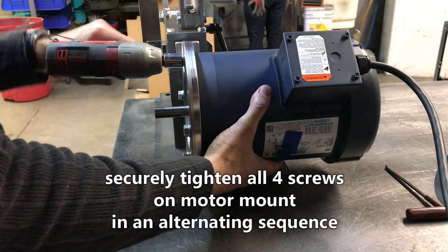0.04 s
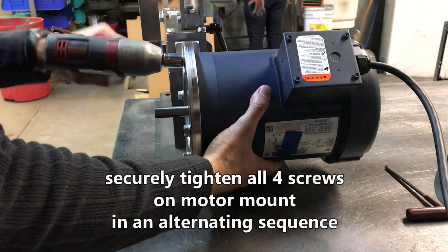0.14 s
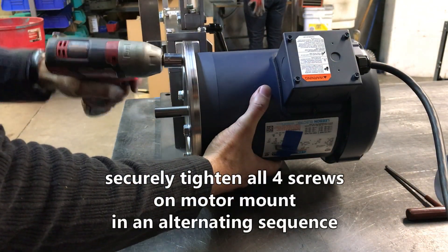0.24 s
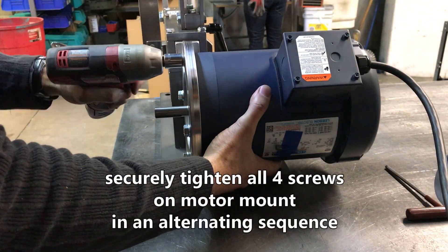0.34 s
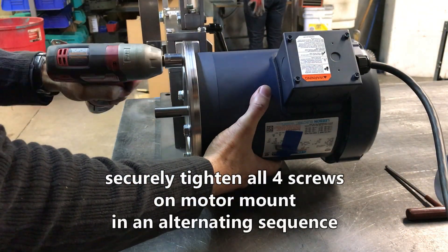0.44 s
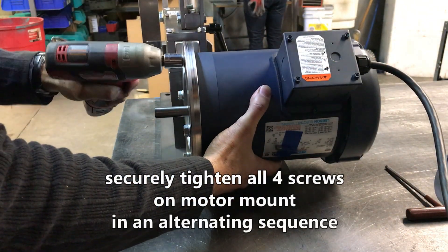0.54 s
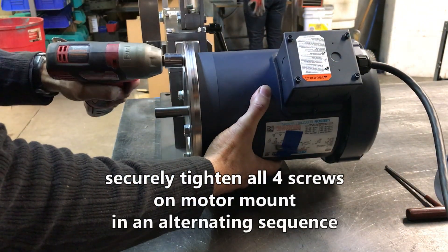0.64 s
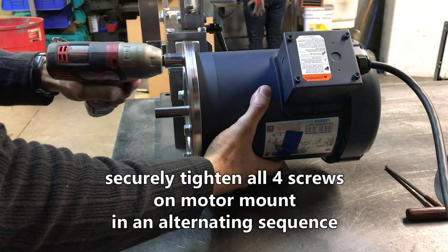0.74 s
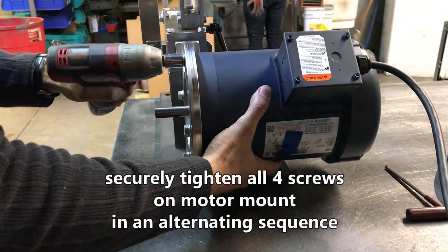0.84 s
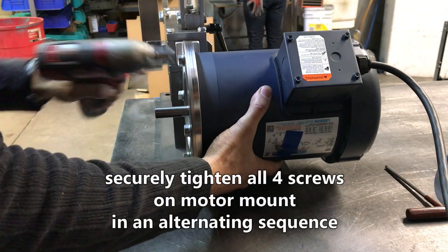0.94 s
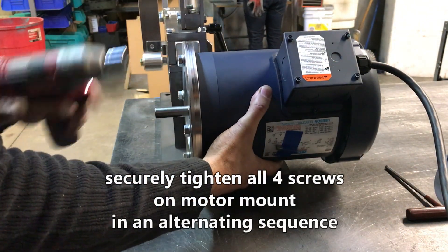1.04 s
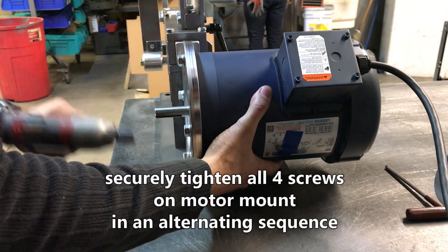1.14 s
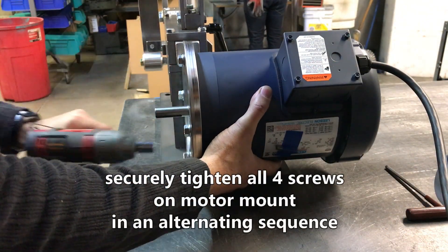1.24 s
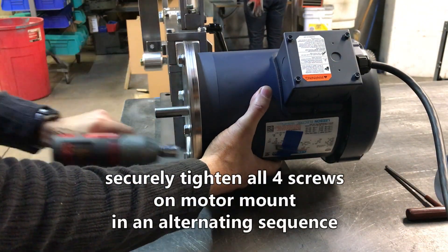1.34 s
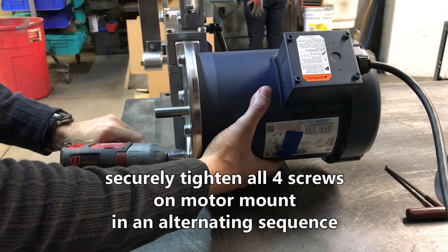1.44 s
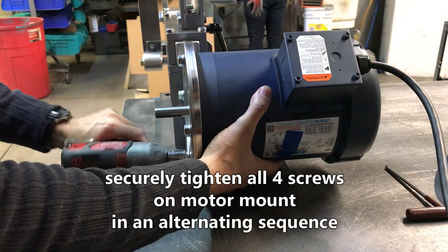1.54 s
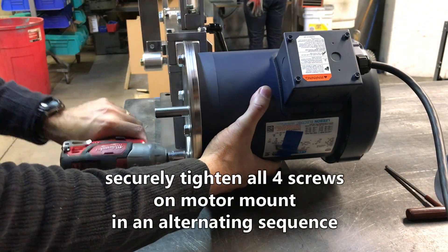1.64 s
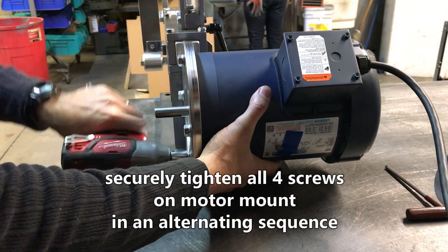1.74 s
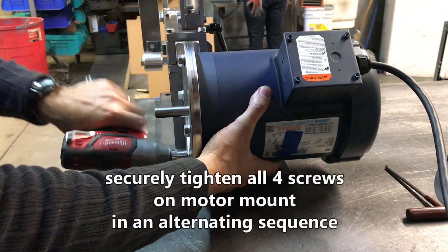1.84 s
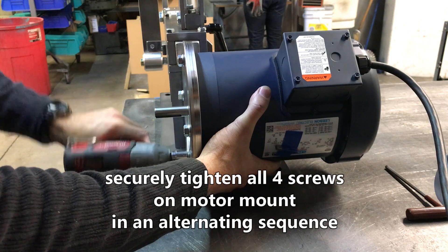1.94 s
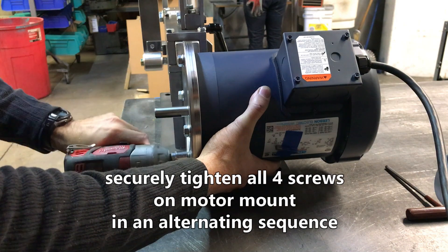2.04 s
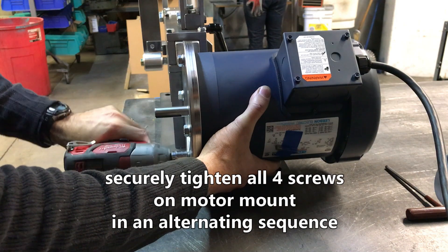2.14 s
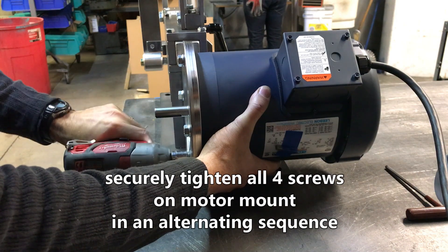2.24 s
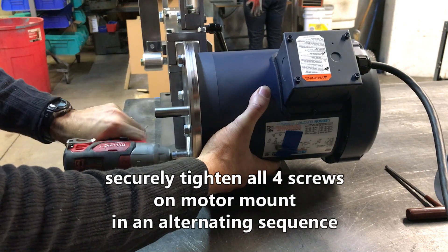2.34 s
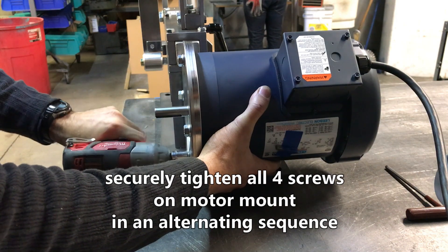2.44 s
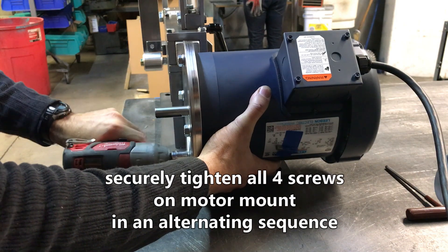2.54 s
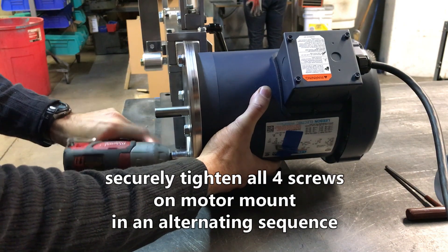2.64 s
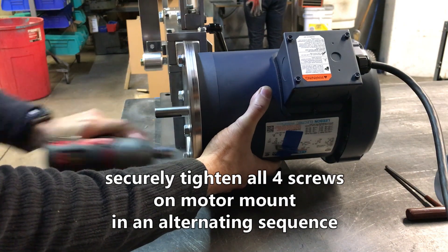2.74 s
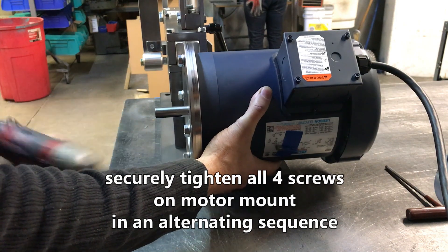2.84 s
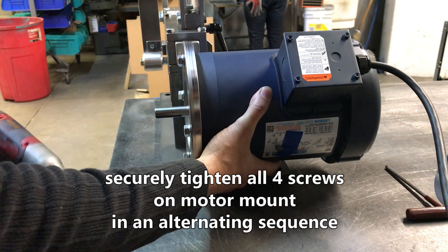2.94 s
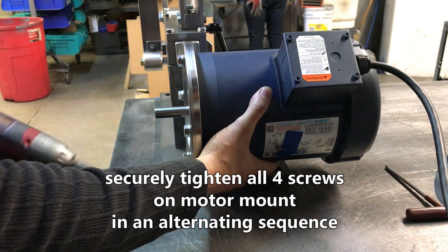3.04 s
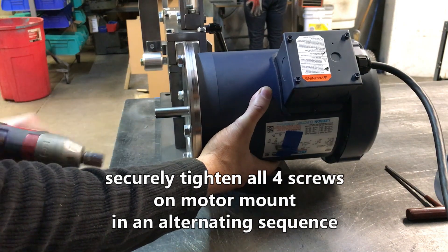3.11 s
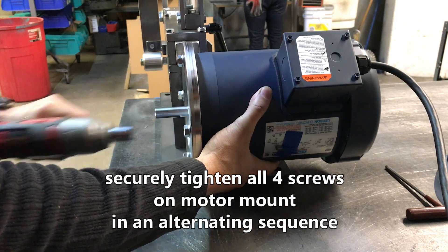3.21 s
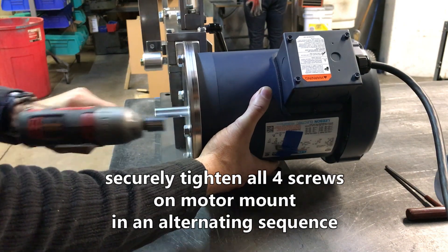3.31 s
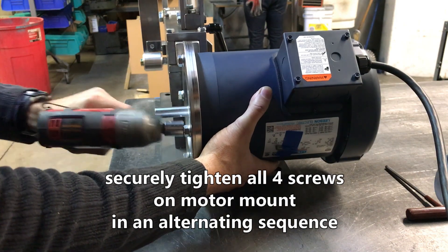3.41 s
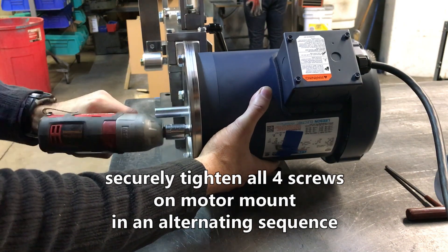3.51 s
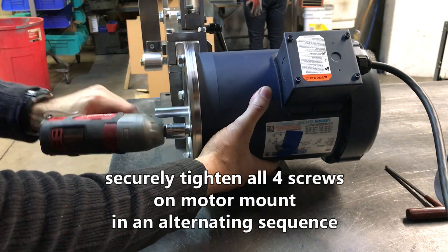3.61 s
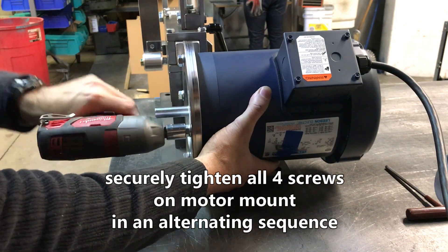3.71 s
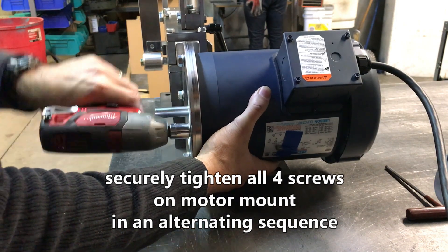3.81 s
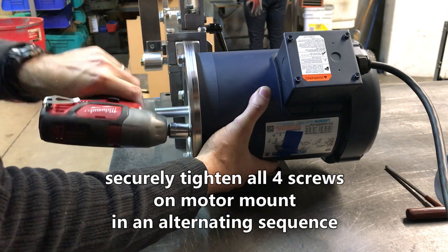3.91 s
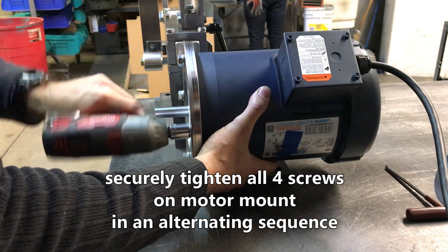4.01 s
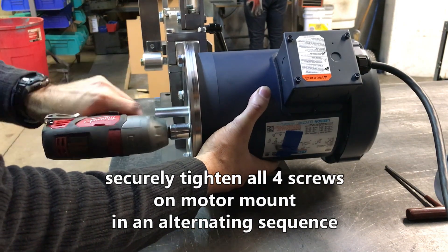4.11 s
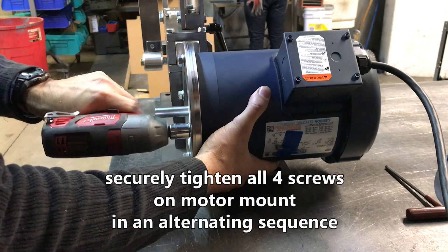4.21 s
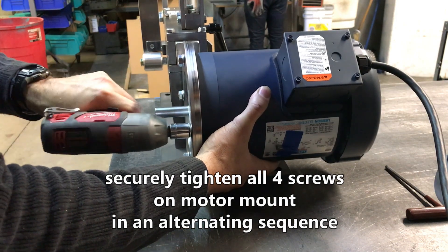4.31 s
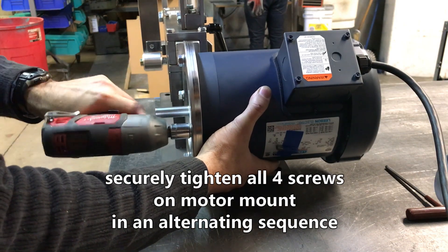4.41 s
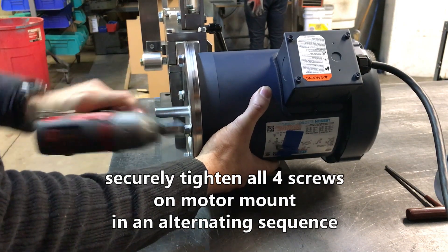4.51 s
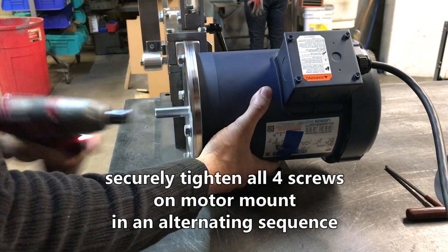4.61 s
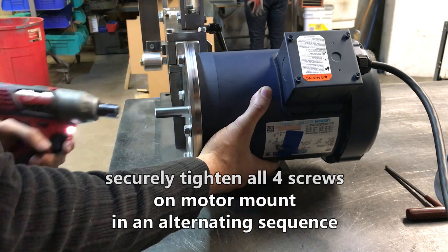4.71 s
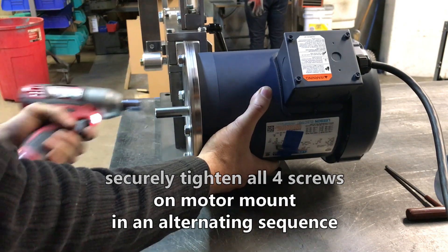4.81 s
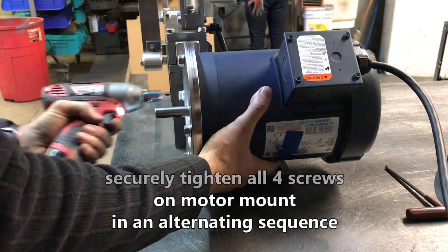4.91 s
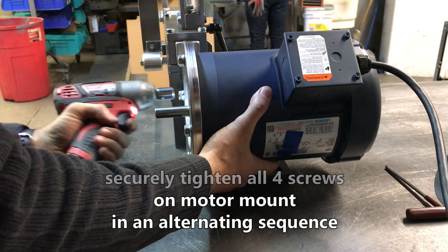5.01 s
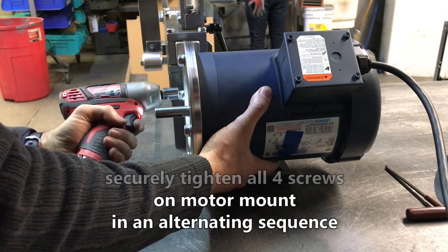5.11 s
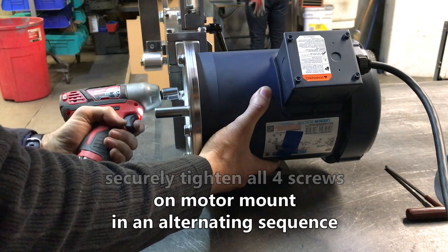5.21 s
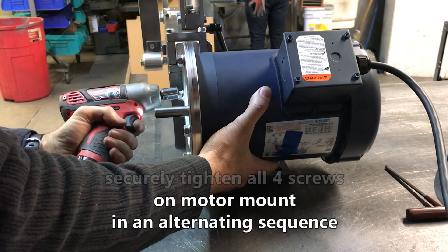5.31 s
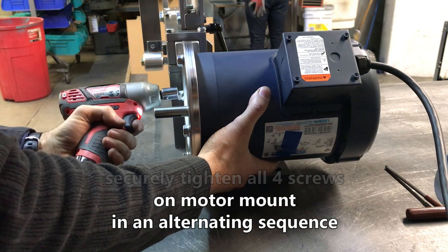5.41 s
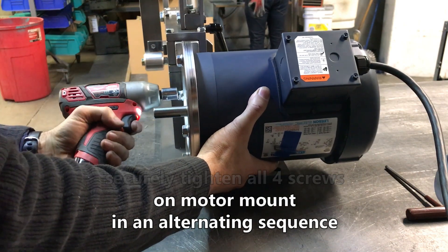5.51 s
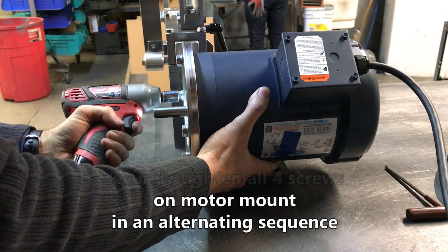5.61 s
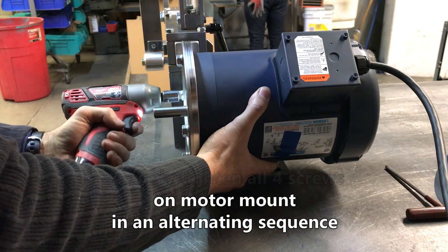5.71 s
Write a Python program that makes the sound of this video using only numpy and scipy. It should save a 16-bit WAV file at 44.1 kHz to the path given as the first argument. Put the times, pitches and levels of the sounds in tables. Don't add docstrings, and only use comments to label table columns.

```python
import sys
import numpy as np
from scipy import signal
from scipy.fft import rfft, irfft, next_fast_len
from scipy.io import wavfile
from scipy.ndimage import map_coordinates

SR = 44100
rng = np.random.default_rng(int(sys.argv[2]) if len(sys.argv) > 2 else 0)


def boost(x):
    u = np.asarray(x, float) / 20
    return 10 ** u


def file_out(sig):
    cols = np.atleast_2d(sig).T
    lim = np.clip(cols, -1, 1)
    pcm = np.round(lim * 32767).astype(np.int16)
    wavfile.write(sys.argv[1], SR, pcm)


N = 253575

# time in seconds, strokes per second.
STROKES = [(0, 11.36), (1.5, 11.4), (2.4, 11.36), (3.2, 11.28), (5.75, 11.24)]
# mode in Hz, width in Hz, dB per stage, lag after stroke in seconds.
CASING = [(368, 26, -4, .014), (452, 14, -1.5, .05), (555, 25, 0.3, .011), (593, 12, -1.3, .012),
          (695, 17, 1.4, .002), (834, 22, -1.3, .03), (975, 30, -2.5, .048), (1030, 20, -2, .025),
          (1120, 18, -2.5, .07), (1238, 18, -2, .08)]
# frequency in Hz, level in dB per Hz.
DRONE = [(200, -57), (330, -11.5), (500, -8.5), (1000, -9), (1300, -10.5), (1650, -14), (3200, -22.5),
         (5000, -44), (8000, -120)]
# frequency in Hz, level in dB per Hz.
HISS = [(900, -32), (1500, -6), (2300, -3), (3200, -2), (4300, -5.5), (4900, -9.5), (6000, -8.5),
        (7000, -12.5), (7600, -15.5), (9500, -15), (10600, -21), (13400, -22), (15800, -30)]
# time in seconds, level in dB.
AIR = [(0, -55.5), (2.5, -55.5), (2.75, -53.5), (3.5, -50.5), (5.75, -51.5)]
# frequency in Hz, level in dB per Hz.
RUMBLE = [(15, -39), (35, -26), (50, -12), (70, -17.5), (120, -7), (200, -10), (320, -12), (450, -65),
          (800, -120)]
# time in seconds, pitch in Hz, level in dB.
WHISTLE = [(2.7, 13450, -95), (2.85, 13420, -82), (3.05, 13380, -79), (3.25, 13300, -78),
           (3.45, 13270, -80), (3.7, 13250, -92)]
# deepest point in seconds, depth in dB (negative lifts the gain).
DUCKS = [(0, -3), (.2, 2), (.9, 4.5), (1.5, 2.8), (2.7, 13), (4.51, 14.5)]
# frequency in Hz, T60 in seconds.
WALLS = [(1000, 0.33), (4000, 0.36), (7000, 0.28), (12000, 0.19)]
# start in seconds, level in dB, sign of the swing, dullness exponent.
JOLTS = [(2.4782, -28, -0.96, 0.17), (4.3556, -20, 0.92, 0.16), (4.3761, -18.5, -1, 0.15),
         (4.4146, -20, 0.74, 0.11), (4.4393, -47, 0.93, .1)]
# time in seconds, level in dB.
GEARS = [
    [(0.57, -51), (0.618, -33), (0.73, -65), (0.768, -57), (0.86, -60), (0.98, -66)],
    [(2.435, -40), (2.565, -38), (2.68, -58)],
    [(4.285, -49), (4.345, -46), (4.47, -64)],
]
# start in seconds, peak in dB, low mode in Hz, middle mode in Hz,
# high share in dB.
CLICKS = [(0.0064, -31, 3570, 5470, -14), (1.427, -14, 4270, 6140, -17.5), (1.454, -30.5, 3990, 6100, -23),
          (1.7945, -17.5, 3730, 6440, -21), (1.9974, -40, 3380, 5350, -13), (3.466, -21, 3920, 5350, -13),
          (3.479, -37, 4030, 5270, -11), (3.8336, -16.5, 4440, 9400, -13), (5.1099, -26.5, 3240, 5600, -29),
          (5.113, -29.5, 3300, 7200, -37), (5.6266, -35.5, 3400, 6560, -22),
          (5.647, -35.5, 3400, 5320, -26)]
# mode in Hz, width in Hz, level in dB.
BIT = [(8380, 360, 0.5), (11200, 270, -14), (12500, 250, -13), (14500, 430, -32)]
# mode in Hz, width in Hz, level in dB.
ANVIL = [(2200, 200, -6), (3350, 150, .5), (3960, 110, -2.5), (6050, 220, 2), (7380, 180, -4),
         (8450, 200, -3), (9550, 200, -3), (11500, 250, -1.5)]
LOOSE_PLATE_DB = [2.5, 4.5, -1, 0, 0, 0, 0, 0]
# frequency in Hz, level in dB per Hz.
STEEL = [(120, -20), (250, -9.5), (1000, -12.5), (1600, 0.5), (3100, -6), (4000, -1), (4900, -5.5),
         (6200, -5), (9000, -6.5), (12500, -4.5), (15800, -13.5)]
# first blow in seconds, gap in seconds, peak in dB, low share in dB, high share in dB.
HAMMERING = [
    (.6607, .0272, -17, -10, -12),
    (2.459, .0196, -16, -14, -9.5),
    (4.3166, .0197, -17, -8.5, -10),
]
BLOW_COUNTS = [6, 9, 6]
BLOW_T60_S = [.058, .07, .085]
# second lug early by seconds, louder by dB.
LUGS = [(.0018, 2.5), (0.0012, -3.7), (0, -3)]
# late by seconds, weaker by dB.
LAST = [(.0328, .3), (.004, 4), (.0034, -.5)]
# start in seconds, peak in dB, high share in dB, loudest region in Hz.
TAKE_UP = [(0.5444, -32, -9, 3860), (0.55, -30, -22, 3320), (2.4189, -23.5, -10, 5940),
           (4.258, -29, -11, 3940), (4.269, -26, -16, 3890)]
# start in seconds, peak in dB, high share in dB, loudest region in Hz.
SPIN_UP = [(0.5877, -29, -22, 3910), (0.5988, -24, -18, 3440), (.61, -14.5, -8.5, 7390),
           (0.6156, -17, -8, 7540), (.6256, -17, -27, 3530), (2.4398, -25, -26, 6200),
           (2.448, -25, -21, 6060), (2.4541, -15, -17, 3930), (4.292, -26, -17, 3930),
           (4.3103, -12.5, -1, 10000)]
# start in seconds, peak in dB, high share in dB, loudest region in Hz.
REBOUNDS = [(.673, -25, -11, 3300), (0.7277, -14.5, -2.5, 9700), (0.82, -28.5, -22, 3040),
            (2.482, -16, -10, 3940), (2.4902, -22, -12, 5800), (2.6254, -23, -18, 11800),
            (2.6514, -21, -5, 3990), (4.343, -15.5, -4, 4220), (4.447, -29, -21, 3860)]
# start in seconds, peak in dB, high share in dB, loudest region in Hz.
SETTLE = [(.951, -40, -26, 6060), (.967, -42, -25, 6000), (4.302, -18.5, -13, 2050)]

MACHINE_DB = -44
GRAB_DB_PER_S, RECOVER_DB_PER_S, TREBLE_SHARE, TREBLE_LAG_S = 80, 28, 0.74, 0.036
AIR_EDGE_HZ, AIR_BRIGHTENS = 1940, 0.42
SHANK_HZ, SHANK_DB = 9700, -1
MIDDLE_DB_PER_HZ = .014
BLOW_RISE_S, CLICK_RISE_S = .0005, .001
CRACK, CRACK_S = .45, .0012
STANDS_OUT_DB = -2
LOOSE_UNTIL_S = 1
LEAD_S, LEAD_DB = 0.0068, -9.5
CHATTER_S, CHATTER_EXTRA_S, CHATTER_DB, CHATTER_FADE_DB = .009, .0057, -27.5, .24
GRAZE_T60_S, LAST_T60_S = .028, .048
KNOCK_T60_S, T60_PER_DB = .044, .0022


def unit(x):
    return x / np.sqrt(np.mean(x ** 2) + 1e-20)


def along(points, hz):
    f, v = np.transpose(points)
    return np.interp(np.log(hz + 1), np.log(f + 1), v)


def curves(rows):
    s, *cols = np.transpose(rows)
    outside = -120 if s[0] > 0 else None
    return [np.interp(np.arange(N) / SR, s, c, left=outside, right=outside) for c in cols]


def wobble(rate_hz):
    knots = rng.standard_normal(int(N * rate_hz / SR) + 4)
    return map_coordinates(knots, [np.arange(N) * rate_hz / SR])


def filtered(x, response):
    m = next_fast_len(len(x) + 8192)
    return irfft(rfft(x, m) * response(np.fft.rfftfreq(m, 1 / SR)), m)[:len(x)]


def resonances(modes, f):
    total = 0
    for k, (hz, width, db) in enumerate(modes):
        damping = 1j * f * width
        total = total + (-1) ** k * boost(db) * damping / (hz * hz - f * f + damping)
    return total


def noise(spectrum):
    return unit(filtered(rng.standard_normal(N), lambda f: boost(along(spectrum, f))))


def duck_db(lag_s):
    t = np.arange(N) / SR - lag_s
    total = 0
    for s, db in DUCKS:
        recovered = np.maximum(GRAB_DB_PER_S * (s - t), RECOVER_DB_PER_S * (t - s))
        total = total - np.sign(db) * np.clip(abs(db) - recovered, 0, None)
    return total


def machine(turns):
    knocks = np.diff(np.floor(turns + .08), prepend=0) * boost(1.2 * wobble(11))

    def far(f):
        return boost(along([(250, -25), (350, 0), (1300, 0), (1800, -30), (4000, -120)], f))

    def panels(f):
        return sum(resonances([(hz, width, db)], f) ** 2 * np.exp(-2j * np.pi * f * lag_s)
                   for hz, width, db, lag_s in CASING)

    casing = filtered(knocks, lambda f: far(f) * panels(f))
    t = np.arange(SR // 2) / SR
    echo = rng.standard_normal(len(t)) * (1 - np.exp(-t / .03)) * boost(-60 * t / .6)
    hall = signal.fftconvolve(knocks, echo)[:N]
    hall = filtered(hall, lambda f: far(f) * boost(along(DRONE, f)))
    drone = noise(DRONE) * boost(.8 * wobble(8))
    return boost(-4.5) * unit(casing) + boost(-6) * unit(hall) + boost(-4.5) * drone


def mains_hum(turns):
    beat = 1 + 0.91 * np.cos(4 * np.pi * turns + 1.0)
    return beat * np.sin(2 * np.pi * 120.0 * np.arange(N) / SR) * boost(3.7 * wobble(7))


def air():
    hiss, (level_db,) = noise(HISS), curves(AIR)
    top = filtered(hiss, lambda f: f > AIR_EDGE_HZ)
    return hiss + (boost(AIR_BRIGHTENS * (level_db - level_db.max())) - 1) * top


def whistle():
    hz, db = curves(WHISTLE)
    phase = 2 * np.pi * np.cumsum(np.abs(hz) + 60 * wobble(60)) / SR
    return boost(db + 1.5 + 2.5 * wobble(40)) * np.sin(phase)


def workshop():
    machine_db = MACHINE_DB + duck_db(0)
    hiss_db = curves(AIR)[0] + TREBLE_SHARE * duck_db(TREBLE_LAG_S)
    turns = np.cumsum(curves(STROKES)[0]) / SR + .27
    bass = boost(-13.5) * mains_hum(turns) + boost(-12.0) * noise(RUMBLE)
    bass = bass * boost(.5 * (machine_db - np.median(machine_db)))
    throb = boost(machine_db + 0.5) * (machine(turns) + bass)
    return throb + boost(hiss_db + 2.5 + 0.36 * wobble(5.3)) * air() + whistle()


def room(x):
    hz, t, z = signal.stft(rng.standard_normal(SR // 2), SR, nperseg=256)
    decay = boost(-60 * t / along(WALLS, hz)[:, None])
    tail = signal.istft(z * decay, SR, nperseg=256)[1]
    return signal.fftconvolve(np.pad(x, (300, 0)), tail / np.linalg.norm(tail))[:N]


def jolts():
    out, t = np.zeros(N + SR), np.arange(1, SR // 20) / SR
    faint = [(s, db - 34.5, rng.choice([-1, 1]), .1) for s, db, *_ in blows() if s > 2.5]
    for s, db, sign, dull in list(JOLTS) + faint:
        swing = np.cos(np.pi * np.log2(t / 0.0072)) * (t / 0.016) ** dull
        swing = swing * np.exp(-(t / 0.023) ** 2) * (1 - np.exp(-(t / 0.00022) ** 2))
        out[round(s * SR):][:len(t)] += np.sign(sign) * boost(db) * swing
    return out[:N]


def gears():
    level = sum(boost(curves(burst)[0]) for burst in GEARS)
    rattle = rng.standard_normal(N) * boost(7.3 * wobble(330))
    rattle = filtered(rattle, lambda f: boost(along(STEEL, f)) + boost(-3) * resonances(ANVIL, f))
    return level * boost(-2.0) * unit(rattle)


def strike(s, db, t60_s, rise_s, broad, ring):
    t = np.arange(SR // 8) / SR
    grains = boost(2.5 * np.interp(t, np.arange(200) / 900, rng.standard_normal(200)))
    force = (1 + CRACK * np.exp(-t / CRACK_S)) * (1 - np.exp(-t / rise_s)) * boost(-60 * t / t60_s)
    spray = rng.standard_normal(len(t)) * grains * force
    hit = filtered(spray * boost(-8 * t / t60_s), broad) + filtered(spray, ring)
    onset_rms = np.sqrt(np.mean(hit[:SR // 200] ** 2))
    return np.pad(boost(db) * hit / onset_rms, (round(s * SR), N))[:N]


def bit():
    out = np.zeros(N)
    for s, db, low_hz, middle_hz, high_db in CLICKS:
        middle_db = min(0, MIDDLE_DB_PER_HZ * (low_hz - 3900))
        modes = [(low_hz, 450, 0), (middle_hz, 300, middle_db), (SHANK_HZ, 300, high_db + SHANK_DB)]
        modes += [(hz, width, level + high_db + 8.5) for hz, width, level in BIT]
        contact = [(700, -41), (1500, -11.5), (3000, -31), (7000, -12.5),
                   (12000, high_db - 37.0), (15500, high_db - 40)]

        def ring(f):
            return sum(resonances([mode], f) for mode in modes) * boost(along([(1500, -10), (3000, 0)], f))

        out += strike(s, db - 9.5, 0.034, CLICK_RISE_S, lambda f: boost(along(contact, f)), ring)
    return out


def blows():
    rows = []
    bursts = zip(HAMMERING, BLOW_T60_S, BLOW_COUNTS, LUGS, LAST)
    for (first, gap, db, low, high), t60_s, count, (early, lug_db), (late, weak_db) in bursts:
        for k in range(count):
            lug = k % 2
            rows.append((first + k * gap - early * lug, db + lug_db * (lug - .5), low, high, t60_s, None))
        rows.append((first + count * gap + late, db - weak_db, low, high, LAST_T60_S, None))

    def low_db(s):
        return min(HAMMERING, key=lambda burst: abs(burst[0] - s))[3]

    count, graze_hz = BLOW_COUNTS[0], ANVIL[1][0]
    soft = [(s - LEAD_S, db + LEAD_DB, high, graze_hz)
            for k, (s, db, _, high, *_) in enumerate(rows[:count]) if k not in (2, 3)]
    chatter_s = rows[count][0] + np.cumsum(CHATTER_S + CHATTER_EXTRA_S * .5 ** np.arange(6))
    soft += [(s, CHATTER_DB - CHATTER_FADE_DB * k * k, HAMMERING[0][4], graze_hz)
             for k, s in enumerate(chatter_s)]
    rows += [(s, db, low_db(s), high, GRAZE_T60_S, hz) for s, db, high, hz in soft + list(SETTLE)]
    for s, db, high, hz in list(TAKE_UP) + list(SPIN_UP) + list(REBOUNDS):
        rows.append((s, db, low_db(s), high, KNOCK_T60_S + T60_PER_DB * (db + 28), hz))
    return rows


def hammer():
    out = np.zeros(N)
    for s, db, low_db, high_db, t60_s, loud_hz in blows():
        loud_hz = loud_hz or ANVIL[rng.choice([1, 2, 3, 3, 4, 5, 6, 7])][0]
        struck = []
        for (hz, width, level), loose_db in zip(ANVIL, LOOSE_PLATE_DB):
            level = level + (s < LOOSE_UNTIL_S) * loose_db + rng.normal(0, 3)
            struck.append((hz * rng.normal(1, .01), width, level))

        def tilt(f):
            return boost(along([(2000, low_db + 4.5), (3200, .3), (7000, 0), (10000, high_db + 7.5)], f))

        def broad(f):
            return tilt(f) * boost(along(STEEL, f)) + boost(STANDS_OUT_DB) * resonances([(loud_hz, 300, 0)], f)

        def ring(f):
            return tilt(f) * boost(-0.5) * resonances(struck, f)

        out += strike(s, db - 8.5, t60_s, BLOW_RISE_S, broad, ring)
    return out


def scene():
    driver = hammer() + bit() + gears()
    return (driver + boost(-15) * room(driver) + jolts() + workshop())[None]


def low_pass(x):
    return signal.sosfilt(signal.butter(12, 16650, fs=SR, output="sos"), x)


def record(dry):
    squeezed = dry[0] / (1 + np.abs(dry[0] / .21) ** 5) ** (1 / 5)
    top_cut = [(15700, 0), (15950, -35), (16600, -55), (16800, -120)]
    mix = filtered(squeezed, lambda f: boost(along(top_cut, f)))
    return low_pass(mix[None])


dry = scene()
out = record(dry)
file_out(out)
```